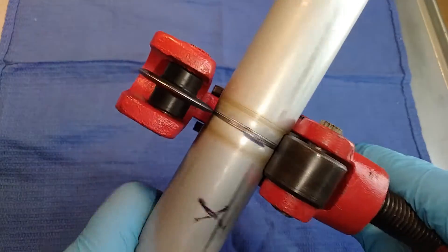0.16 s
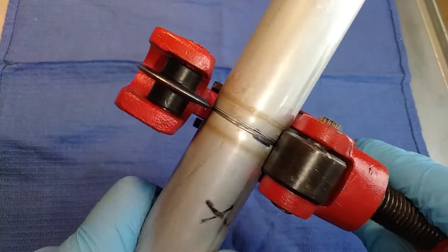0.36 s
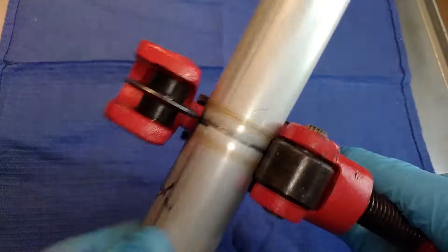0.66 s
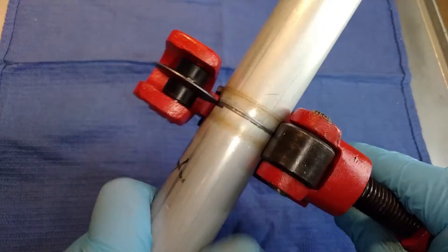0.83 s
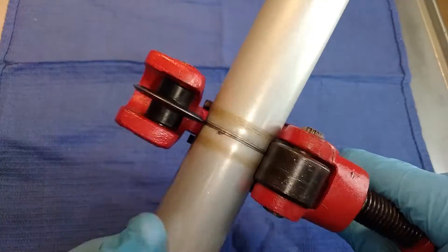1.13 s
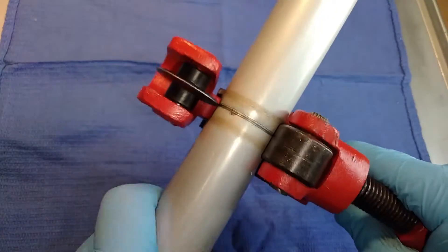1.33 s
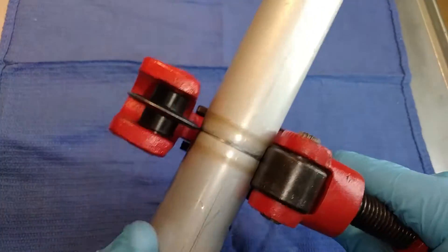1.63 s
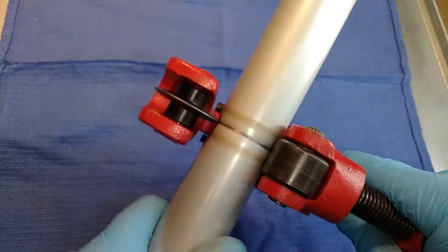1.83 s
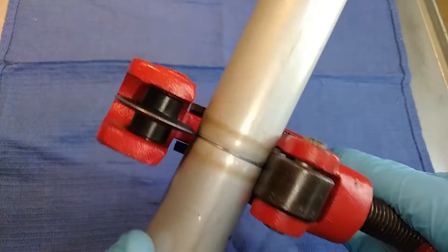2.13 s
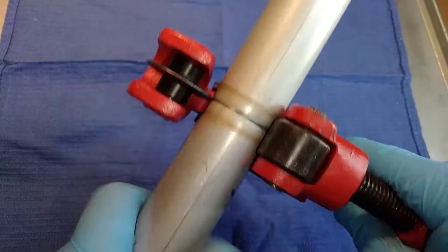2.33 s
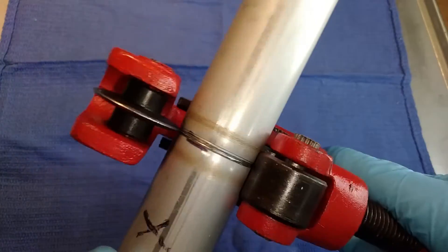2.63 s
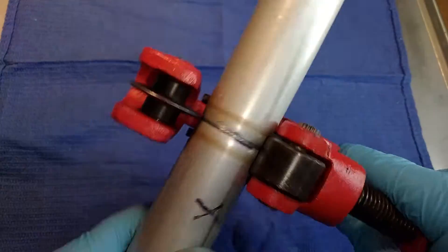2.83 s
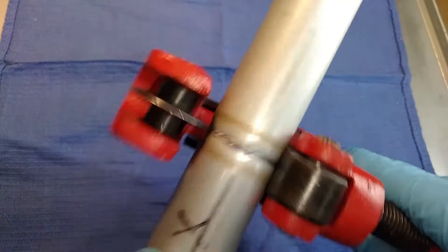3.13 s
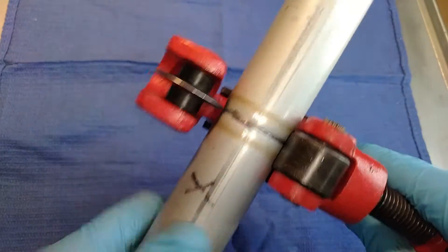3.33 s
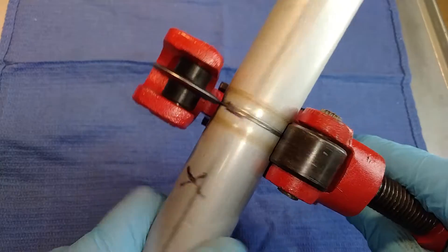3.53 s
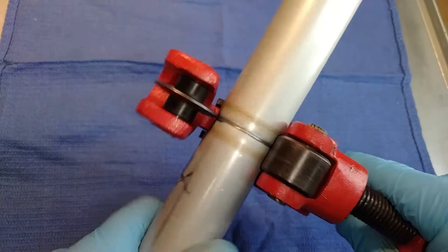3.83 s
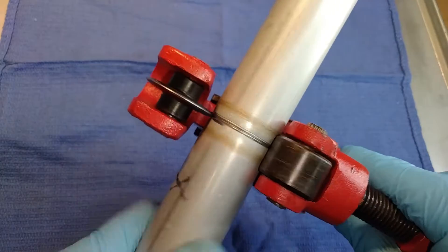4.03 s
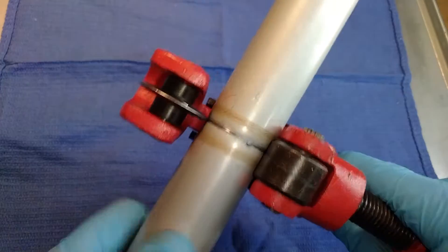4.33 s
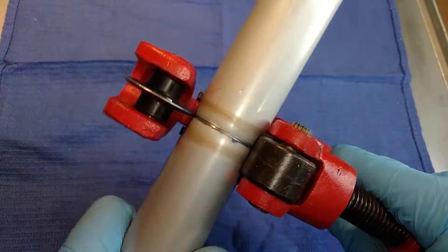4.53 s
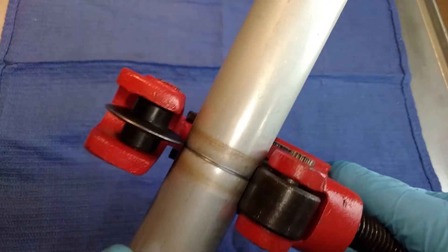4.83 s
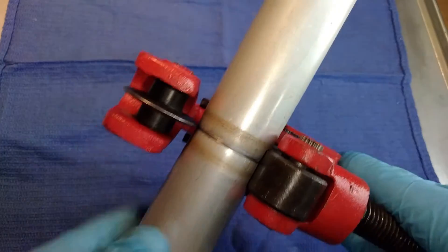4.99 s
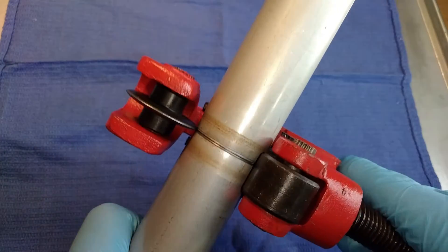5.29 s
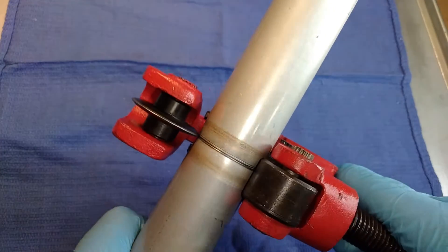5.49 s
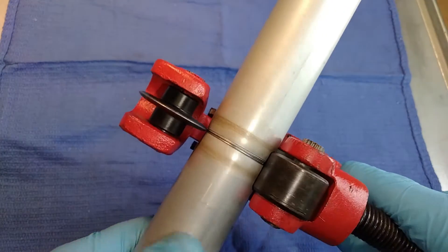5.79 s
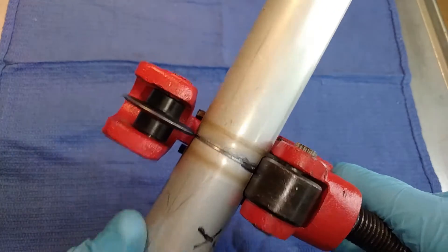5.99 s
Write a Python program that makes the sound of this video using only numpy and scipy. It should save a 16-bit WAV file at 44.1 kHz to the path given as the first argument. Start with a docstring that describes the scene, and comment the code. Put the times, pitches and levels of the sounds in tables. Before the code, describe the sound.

Over soft low ventilation hum, a cutter's rollers and wheel grind round a metal tube in uneven hand strokes. Dry knocks with a brief metallic ring mark the strokes, glove friction hisses between them, and tiny faint squeaks slip through. A crackling cluster of hard clicks comes late, then just a tick and faint rubbing. Near, crisp stereo phone pickup in a small room.

```python
"""Over a low ventilation hum a knock and a scrape come at once: a hand pipe cutter round a steel tube, near a phone.
A gloved hand twists the tube in short strokes. Knocks and rubbing both drive a bank of damped modes;
noise shaped in level by the strokes makes grind, rumble, hiss and wheel scrape, and bent sine tones squeak.
Two microphone ports shade the near sound, a small workshop adds a diffuse tail, and the hum is shaped noise."""
import sys
import numpy as np
from scipy import signal
from scipy.fft import rfft, irfft
from scipy.io import wavfile
from scipy.ndimage import uniform_filter1d

SR = 44100
rng = np.random.default_rng(int(sys.argv[2]) if len(sys.argv) > 2 else 0)


def dump(signal):
    """Clip the signal to [-1, 1] and save it as 16-bit WAV at the path in sys.argv[1]."""
    limited = np.clip(np.atleast_2d(signal).T, -1, 1)
    pcm = np.round(limited * 32767).astype(np.int16)
    wavfile.write(sys.argv[1], SR, pcm)


N = 271215

# knocks, each a soft thud plus a hard tick: start_s, thud_db (at 300 Hz), thud_dulling_db_per_oct,
# tick_db (at 5 kHz), tick_tilt_db_per_oct, bluntness_db_per_oct (above the wheel pitch), free_ring_db
KNOCKS = [(0.032, -35, -7, -15.5, -5.5, 5, -26.5), (0.2364, -41, 14, -42.5, 3, 2, -61),
          (0.2584, -13, 2, -34, 3, 33, -53), (0.2985, -43, 6, -30.5, -3, -10, -84),
          (0.303, -51, -9.5, -15, 3, 6.5, -54), (0.7944, -35, 5, -35.5, 3, 24, -70),
          (0.8356, -29, 15, -32.5, -5, 10, -70), (0.8573, -30, 7, -23.5, 2.5, 9, -58),
          (0.9162, -35, 10, -31.5, -1, 1, -63), (1.5142, -40, 17, -45.5, 9, 28, -68),
          (1.624, -19, -1.5, -29.5, -21.5, 10, -38), (1.8785, -44, 17, -36.5, 9, 42, -68),
          (1.8919, -6.5, 8, -26, 1, 42, -61), (2.45, -19, 9.5, -33.5, -11, -13, -56),
          (2.657, -11.5, 0, -17.5, -0.5, 15, -26), (2.9184, -48, 8, -43, 4, 12, -66),
          (2.94, -9.5, 1.5, -19, -6.5, 36, -46), (3.6487, -23.5, -0.5, -18.5, 6.5, 5.5, -36.5),
          (3.7403, -24, 2.5, -43, -13, -15, -49), (3.927, -9.5, 0.5, -21, 11, 34, -40),
          (4.021, -44.5, -2.5, -37.5, 3, -1, -62), (4.5433, -37, 13, -19, 1, 7.5, -43),
          (4.5514, -40.5, -2.5, -23, 0, -6, -50), (4.5588, -35.5, -2, -14, 7, 19.5, -43),
          (4.5689, -38, 1, -21, 10, 19, -43), (4.5757, -47, -0.5, -18, 9, 20, -43),
          (4.58, -41, -4.5, -20, 4, 3, -50.5), (4.59, -31, -1, -21, 4, -10, -36.5),
          (4.592, -34, -3.5, -11.5, 5, 30.5, -39), (4.6045, -28, 3, -23, 5, 7.5, -40),
          (4.625, -32.5, 2, -19, 1.5, 28, -53), (4.6302, -31.5, 1.5, -9.5, 4, 50, -32.5),
          (4.6339, -31.5, -1.5, -22, 2, -8.5, -41), (5.4303, -67, 10.5, -18, 3.5, 4, -68.5),
          (5.8198, -41.5, 13, -46, 2.5, 3, -74.5)]
# centres of the four rubbing sounds: pitch_hz of tube grind, roller rumble, glove hiss, wheel scrape
RUB_CENTRE_HZ = [2600, 400, 12000, 6000]


def undb(db):
    """Decibels to an amplitude ratio."""
    return 10 ** (np.asarray(db) / 20)


def across(hz, points_hz, values):
    """Values given at a few frequencies (rows), read at hz on a log axis."""
    order = np.argsort(points_hz)
    sorted_hz = np.array(points_hz)[order]
    place = np.interp(np.log(hz), np.log(sorted_hz), np.arange(len(order)))
    low = min(int(place), len(order) - 2)
    below, above = values[order[low]], values[order[low + 1]]
    return (low + 1 - place) * below + (place - low) * above


def table(rows, hz):
    """A (Hz, value) table read at hz on a log axis."""
    at_hz, value = np.transpose(rows)
    return np.interp(np.log(hz + 1), np.log(at_hz + 1), value)


def walk(rate_hz):
    """Random levels slewed over 1 / rate_hz seconds each; spread near 1."""
    step = int(SR / rate_hz)
    levels = rng.standard_normal(N // step + 1)
    return uniform_filter1d(np.repeat(levels, step), step)[:N]


def hum():
    """Ventilation noise, alike on both ports in the bass and unrelated in the treble."""
    # pitch_hz, relative level_db per Hz
    spectrum = [(20, -11.5), (80, 3), (130, -4), (210, -14), (300, -11), (600, -22), (1200, -29),
                (2600, -36.5), (6500, -38.5), (10000, -52.5), (16000, -45)]
    # pitch_hz, likeness of left and right (1 = same, 0 = unrelated)
    likeness = [(60, 0.85), (130, 0.9), (290, 0.4), (640, 0.2), (1410, 0.05), (3100, 0.05), (6820, -0.09),
                (15000, 0.12)]
    level_db = -44  # rms
    hz = np.arange(N // 2 + 1) * SR / N
    alike = np.clip(table(likeness, hz), -.9, .99)
    noise = rfft(rng.standard_normal((2, N))) * undb(table(spectrum, hz))
    mid, side = noise * np.sqrt([1 + alike, 1 - alike])
    air = irfft([mid + side, mid - side], N)
    air = air * undb(walk(rate_hz=4.1))  # drifts by about 1 dB
    return air * undb(level_db) / np.std(air)


def knock_db(hz, free):
    """Drive of a mode at hz by every knock: a dull thud and a bright tick add in power."""
    thud_at_hz, tick_at_hz = 300, 5000
    foot_hz, foot_db_per_oct = 2806, 28.5  # thuds fall off above the foot, ticks below it
    wheel_hz, wheel_db, wheel_oct = 6700, 1, .23  # ticks favour modes round the wheel's own pitch
    ring_split_hz, high_ring_db = 4000, -18.5  # the high free ring follows the tick
    thud, dulling, tick, tilt, bluntness, ring = np.transpose(KNOCKS)[1:]
    if free:
        return ring if hz < ring_split_hz else tick + high_ring_db
    above_foot_oct = np.log2(hz / foot_hz)
    thud = thud - dulling * np.log2(min(hz, foot_hz) / thud_at_hz)
    thud = thud - foot_db_per_oct * max(above_foot_oct, 0)
    tick = tick + tilt * np.log2(max(hz, foot_hz) / tick_at_hz)
    tick = tick - foot_db_per_oct * max(-above_foot_oct, 0)
    above_wheel_oct = np.log2(hz / wheel_hz)
    tick = tick + wheel_db * np.exp(-(above_wheel_oct / wheel_oct) ** 2)
    tick = tick - bluntness * max(above_wheel_oct, 0)
    return 10 * np.log10(undb(2 * thud) + undb(2 * tick))


def strokes():
    """Grind, rumble, hiss and scrape levels in dB per sample: each hand stroke rises, holds and fades."""
    # full_strength_s, rise_s, hold_s, fade_s, tube_grind_db, roller_rumble_db, glove_hiss_db, wheel_scrape_db
    twists = [(0.046, .01, 0.038, 0.19, -31.5, -47.5, -72, -31.5),
              (0.317, .01, 0.023, 0.16, -48, -40.5, -40, -42.5),
              (0.527, 0.044, 0.065, 0.19, -44, -57, -35.5, -44.5),
              (0.712, .04, 0.008, .04, -42.5, -53, -53, -50.5),
              (0.84, 0.11, 0.072, 0.04, -33.5, -40.5, -43, -49),
              (1.066, 0.043, 0.054, 0.22, -42.5, -55, -39, -49.5),
              (1.253, .04, 0.0064, 0.018, -43.5, -65, -46, -47.5),
              (1.357, 0.075, 0.1, 0.074, -33.5, -41.5, -61, -45.5),
              (1.641, .01, 0.076, 0.056, -31.5, -42.5, -51, -44),
              (1.951, 0.099, 0.0056, 0.069, -30, -31, -54, -44),
              (2.111, 0.058, 0.087, .1, -42, -52.5, -37.5, -46),
              (2.452, 0.18, 0.0059, 0.094, -28, -33, -43, -42.5),
              (2.651, .01, 0.09, 0.13, -29, -38.5, -57, -40.5),
              (3.006, 0.11, 0.012, 0.038, -26, -32, -38, -45),
              (3.147, 0.034, .11, 0.13, -42, -53, -39, -47),
              (3.463, 0.094, 0.049, 0.04, -29.5, -33, -43.5, -47),
              (3.651, .01, 0.062, 0.15, -27, -40, -29, -44),
              (3.923, .01, 0.069, 0.09, -30, -35.5, -48, -42),
              (4.148, 0.052, 0.076, 0.19, -45.5, -65, -38, -49),
              (4.547, 0.2, 0.0072, 0.015, -42, -42, -55, -49),
              (4.653, .02, 0.012, 0.22, -20.5, -48, -30.5, -32),
              (4.81, .08, 0.029, 0.38, -43.5, -55, -41, -52.5),
              (5.246, .03, 0.013, 0.036, -68, -59, -69.5, -62),
              (5.39, 0.068, .05, .1, -70.5, -67, -69, -63.5),
              (5.742, 0.44, 0.063, 0.042, -48, -48, -61, -53.5),
              (5.972, 0.036, 0.015, 0.28, -44, -66, -38.5, -48)]
    edge_db, rise_bend, fade_bend = 33.5, 1.27, 1.02  # level lost one rise before, one fade after the hold
    t = np.arange(0, N + 64, 64) / SR
    power = np.full((len(RUB_CENTRE_HZ), len(t)), 1e-8)  # -80 dB floor
    for full_s, rise_s, hold_s, fade_s, *levels_db in twists:
        before = np.clip((full_s - t) / rise_s, 0, 9) ** rise_bend
        after = np.clip((t - full_s - hold_s) / fade_s, 0, 9) ** fade_bend
        power += undb(2 * (np.array(levels_db)[:, None] - edge_db * (before + after)))
    sample_s = np.arange(N) / SR
    return np.array([np.interp(sample_s, t, 10 * np.log10(p)) for p in power])


def grit(rate_hz, spread_db):
    """Dense tiny catches of uneven size, rms 1."""
    catches = rng.random(N) < rate_hz / SR
    force = catches * undb(spread_db * rng.random(N)) * rng.standard_normal(N)
    return force / np.std(force)


def metal():
    """Knocks and rubbing drive the same damped modes of tube and cutter frame; left and right."""
    # pitch_hz, level_db, t60_s; damped by the hands, except the long ones: free ring of the tube wall
    modes = [(215, -7, .025), (285, -2, .06), (405, -4, .03), (520, -8, .02), (680, -12, .02),
             (840, -3, .035), (1050, -8, .015), (1310, -2, .03), (1650, -6, .015), (1950, -4, .015),
             (2300, -5, .012), (2760, -4, .008), (3200, 3, .006), (3700, -1, .005), (4400, -6, .0045),
             (5100, -7, .004), (5800, -2, .004), (6480, -1, .01), (6900, -2, .01), (7700, -6, .005),
             (8900, -3, .005), (10000, -3, .005), (12000, -1, .003), (13400, -4, .003), (14600, -2, .003),
             (2262, -12, .12), (2347, -6, .18), (2432, 3, .3), (2503, -13, .12), (2977, -6, .18),
             (6603, -6, .16), (6661, -8, .16), (7078, -6, .16), (7275, -12, .14)]
    # how well rubbing reaches a mode: pitch_hz, level_db
    rub_reach = [(300, -2), (1200, -18), (2400, -19), (4500, -1.5), (6700, -2), (9500, -14.5), (14000, -16)]
    free_t60_s, soft_hz, thud_hz = .1, 1800, 600
    chatter_db, chatter_t60_s = -18.5, .052
    start_s = np.transpose(KNOCKS)[0]
    twist_db = strokes()
    chance = rng.standard_normal((len(start_s), 3, len(modes))).T
    # the rubbing spot is wide: part of its sound differs between the ports
    rubbing = grit(rate_hz=5000, spread_db=6.5) + .5 * rng.standard_normal((2, N))
    chatter_fade = 1000 ** (-1 / (chatter_t60_s * SR))
    out = 0
    for k, ((hz, db, t60_s), (level, delay, side)) in enumerate(zip(modes, chance)):
        free = t60_s > free_t60_s
        r, turn = 1000 ** (-1 / (t60_s * SR)), 2 * np.pi * hz / SR
        # in each knock every mode gets its own small chance in level, left-right lean and start,
        # within about a millisecond or two
        sign = 1 if hz < thud_hz else (-1) ** k
        size = undb(knock_db(hz, free) + db + 1.2 * level) * sign
        lean = undb(1.2 * np.array([side, -side]))
        at = ((start_s + .0009 * np.abs(delay)) * SR).astype(int)
        # some modes of a knock start one sample later on the right, which loosens the stereo image
        right_at = at + (side > .5)
        force = np.zeros((2, N))
        np.add.at(force, ([[0], [1]], [at, right_at]), size * lean)
        # loose parts chatter briefly after each knock
        chatter = signal.lfilter([1], [1, -chatter_fade], np.abs(force))
        chatter = undb(chatter_db) * (not free) * chatter
        # the rubbing level of each mode wanders on its own
        wander_db = 3.5 * walk(rate_hz=6)
        rub_db = across(hz, RUB_CENTRE_HZ, twist_db) + table(rub_reach, hz) + db
        rub_db = rub_db - free * 11.0 + wander_db
        # the root keeps steady rubbing at a level that does not depend on decay
        steady = np.sqrt(1 - r ** 2) * np.roll(rubbing, int(hz / 20), axis=1)
        force += (undb(rub_db) + chatter) * steady
        # low modes start softly and carry no treble, high modes carry no bass
        drive = [0, r * np.sin(turn)] if hz < soft_hz else [.5, 0, -.5]
        out = out + signal.lfilter(drive, [1, -2 * r * np.cos(turn), r ** 2], force)
    # keep deep bass out of the knocks and rubbing
    return signal.sosfilt(signal.butter(3, 150., "high", fs=SR, output="sos"), out)


def squeaks():
    """Short stick-slip tones of two partials that swell and fade, wavering slightly in pitch."""
    # start_s, length_s, pitch_hz, level_db, second_partial_db (re first)
    tones = [(1.34, 0.041, 841, -49, -23), (2.151, 0.032, 937, -51, -30), (2.156, 0.041, 1660, -49.5, -27),
             (3.16, 0.015, 802, -47, -21), (3.271, 0.024, 940, -53, -17), (4.157, 0.059, 703, -57.5, -14),
             (5.972, 0.076, 743, -48, -31)]
    out = np.zeros(N)
    waver = walk(rate_hz=60)
    for start_s, length_s, hz, db, second_db in tones:
        span = slice(int(start_s * SR), int((start_s + length_s) * SR))
        phase = np.cumsum(2 * np.pi * hz * (1 + .0032 * waver[span]) / SR)
        swell = np.hanning(len(phase)) ** .23
        tone = np.sin(phase) + undb(second_db) * np.sin(2 * phase)
        out[span] += undb(db) * swell * tone
    return out


def ports(x):
    """The two microphone ports hear a near source with different shading and phase."""
    # shading by the phone body: pitch_hz, left_minus_right_db
    shading = [(200, -2), (500, 3), (1000, -1), (3000, 0), (4500, -3.5), (7200, -8), (9300, 5), (12000, -3)]
    # pitch_hz, left_lead_rad
    lead = [(200, 0), (1300, -.3), (2400, .6), (3300, -2), (5900, -2.4), (7700, -1.2), (8500, .7),
            (9600, -1.1), (11000, -2.5), (15000, -5)]
    hz = np.arange(N // 2 + 1) * SR / N
    half = undb(table(shading, hz) / 2)
    left = half * np.exp(1j * table(lead, hz))
    return irfft(rfft(x) * [left, 1 / half], N)


def room(x):
    """A short diffuse workshop tail, unrelated left and right, thin in the bass and a little dull."""
    # band edges of the tail: low_hz, high_hz
    band_hz = [450, 8300]
    t60_s, level_db = .35, -13
    t = np.arange(int(.5 * SR)) / SR
    decay = np.exp(-np.log(1000) * t / t60_s) * (t > .004)
    tail = rng.standard_normal((2, len(t))) * decay
    tail = signal.sosfilt(signal.butter(1, band_hz, "band", fs=SR, output="sos"), tail)
    tail = tail / np.sqrt(np.sum(tail ** 2) / 2)  # mean energy 1 per side
    return undb(level_db) * signal.fftconvolve(x, tail, axes=1)[:, :N]


def scene():
    """Near sounds through the ports, their room tail, and the hum."""
    near = metal() + squeaks()
    return ports(near) + room(near) + hum()


def record(dry):
    """The phone rounds the loudest peaks and cuts the top."""
    top_hz = 15900
    top_cut = signal.ellip(10, .2, 90, top_hz, fs=SR, output="sos")
    return signal.sosfilt(top_cut, np.tanh(dry))


dry = scene()
out = record(dry)
dump(out)
```